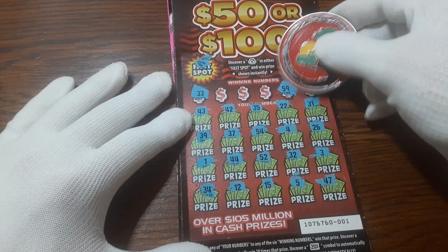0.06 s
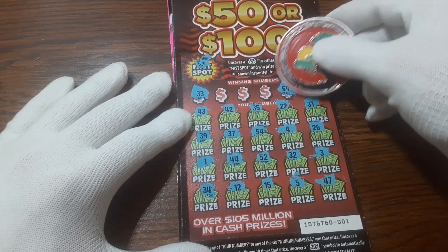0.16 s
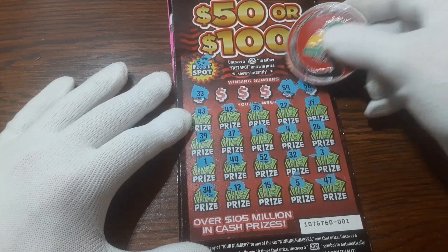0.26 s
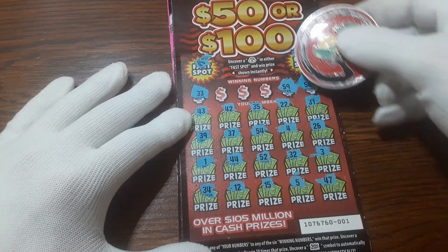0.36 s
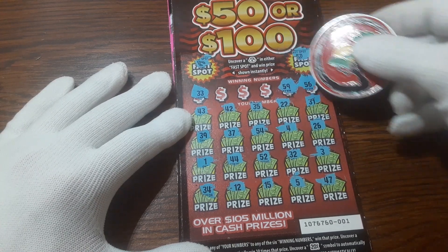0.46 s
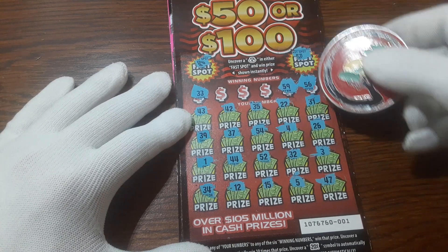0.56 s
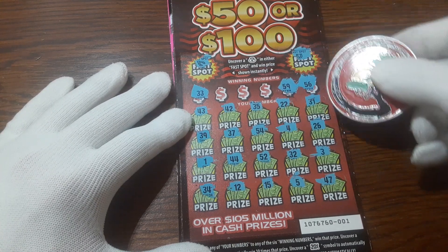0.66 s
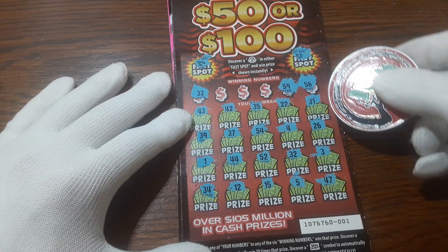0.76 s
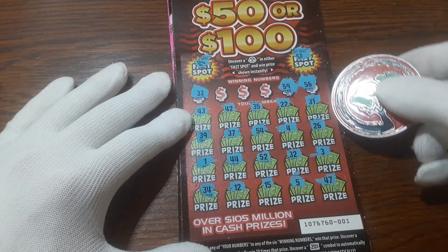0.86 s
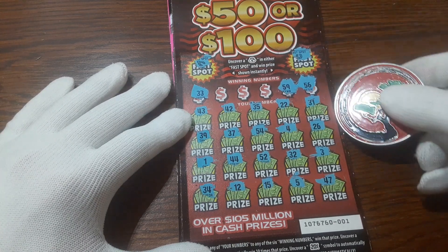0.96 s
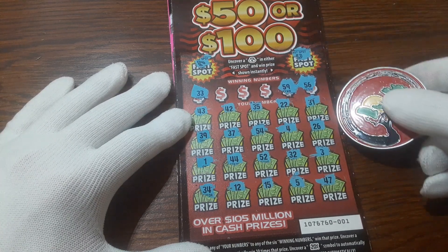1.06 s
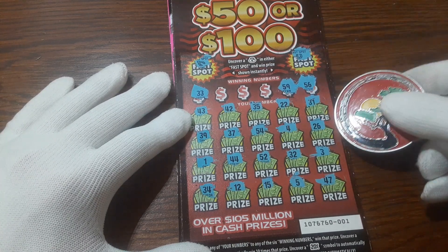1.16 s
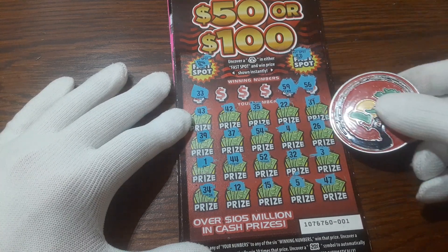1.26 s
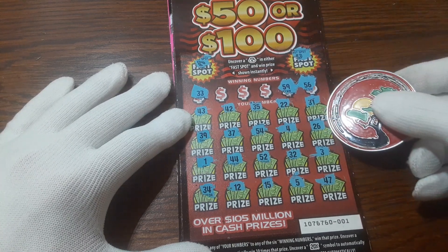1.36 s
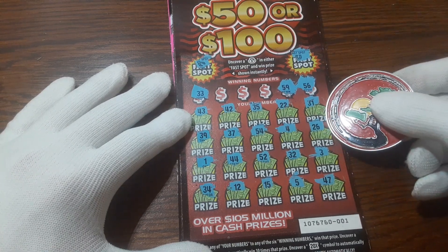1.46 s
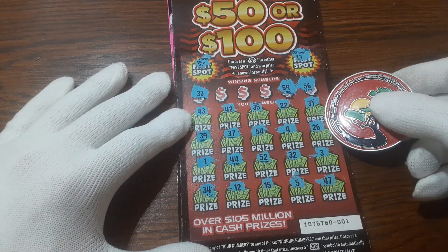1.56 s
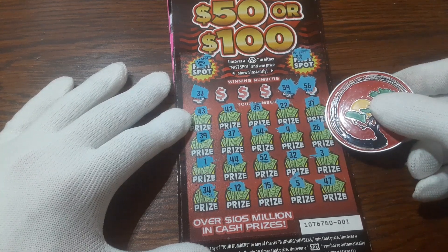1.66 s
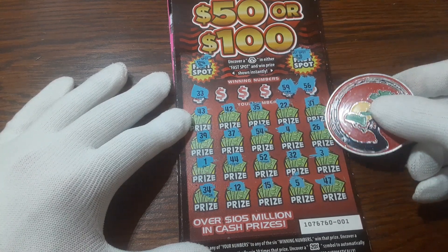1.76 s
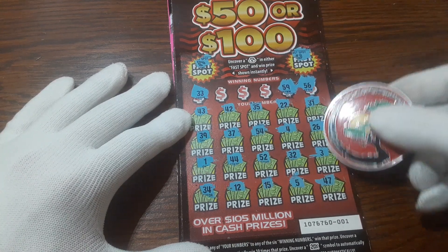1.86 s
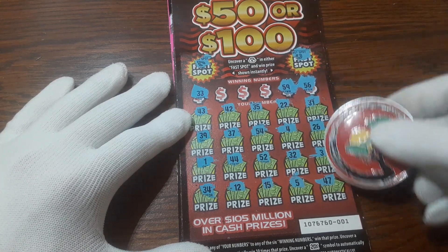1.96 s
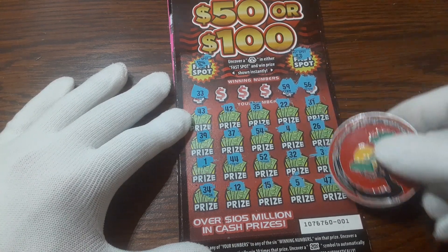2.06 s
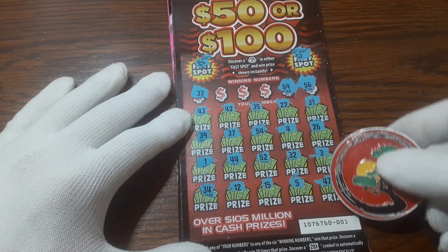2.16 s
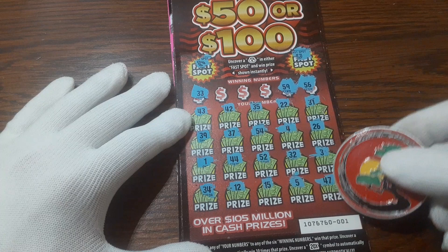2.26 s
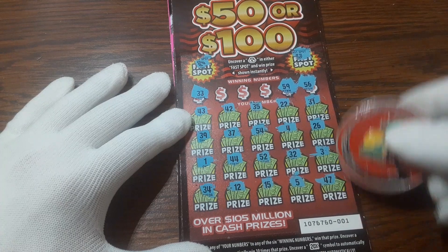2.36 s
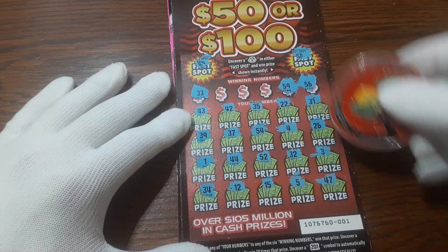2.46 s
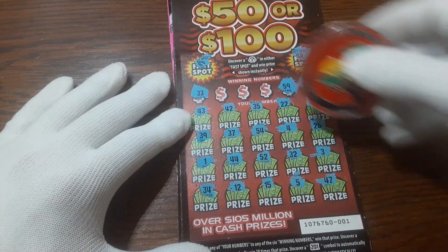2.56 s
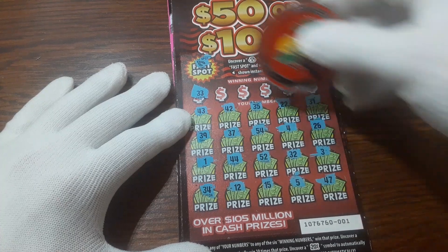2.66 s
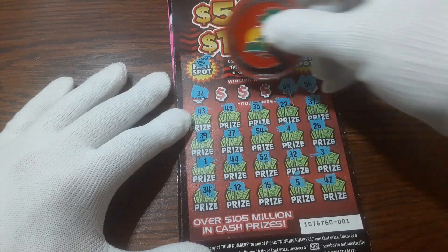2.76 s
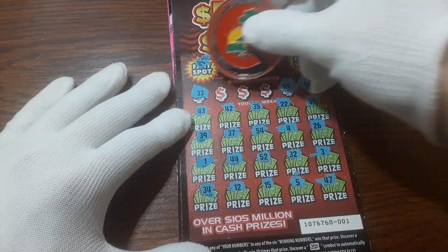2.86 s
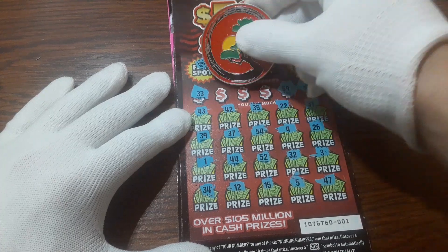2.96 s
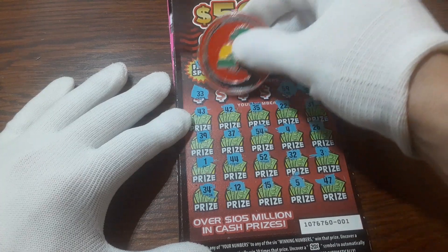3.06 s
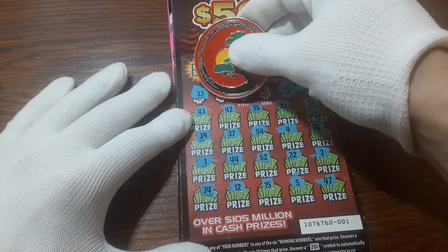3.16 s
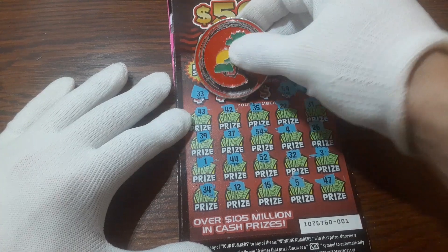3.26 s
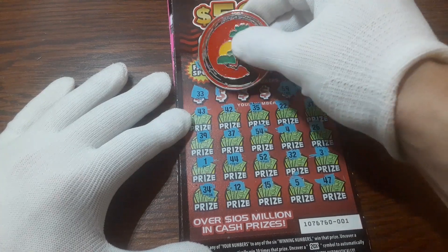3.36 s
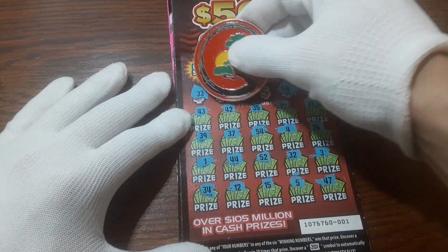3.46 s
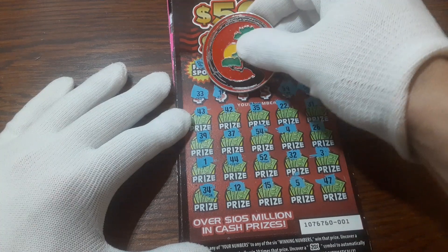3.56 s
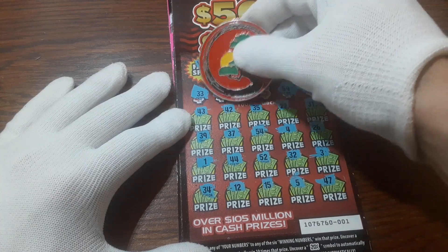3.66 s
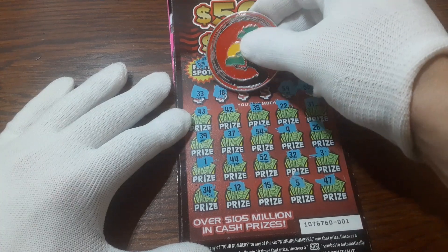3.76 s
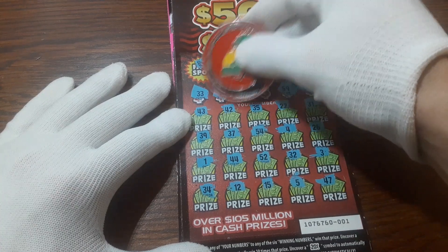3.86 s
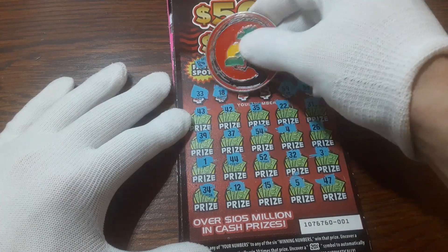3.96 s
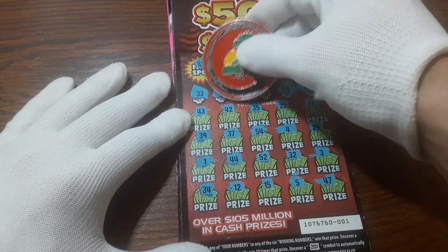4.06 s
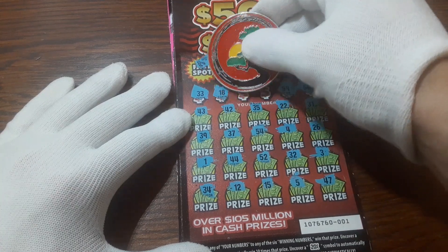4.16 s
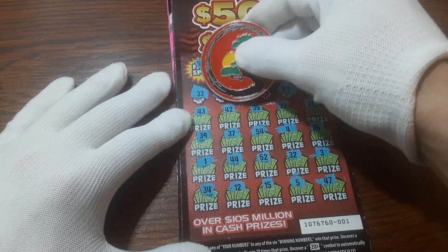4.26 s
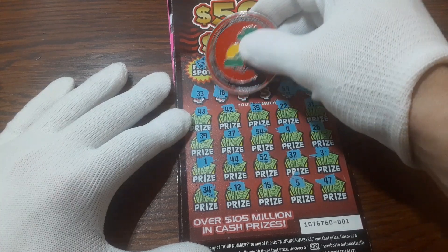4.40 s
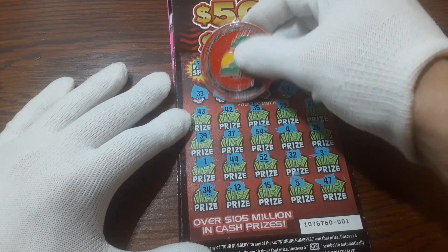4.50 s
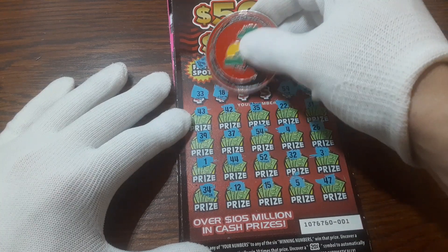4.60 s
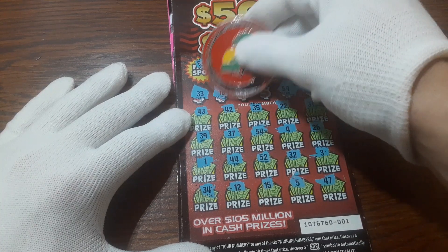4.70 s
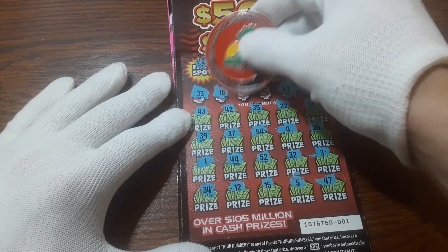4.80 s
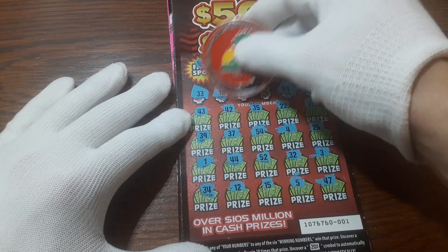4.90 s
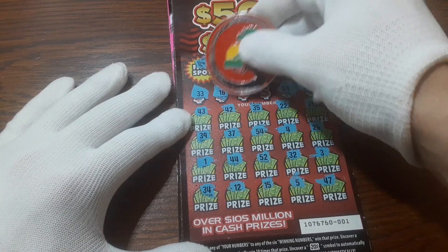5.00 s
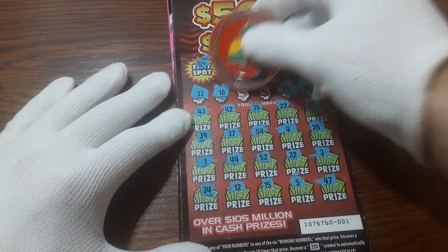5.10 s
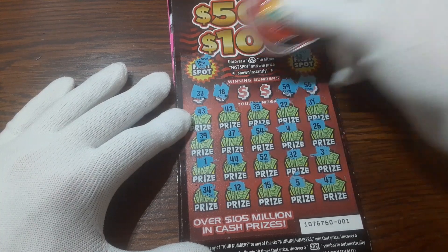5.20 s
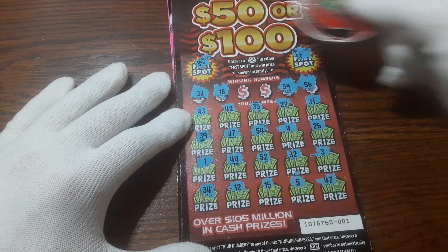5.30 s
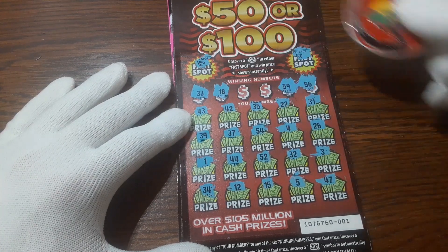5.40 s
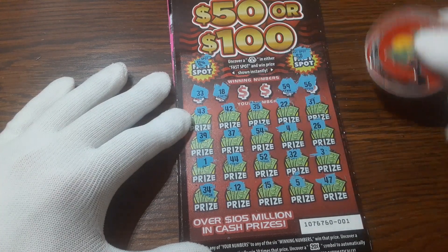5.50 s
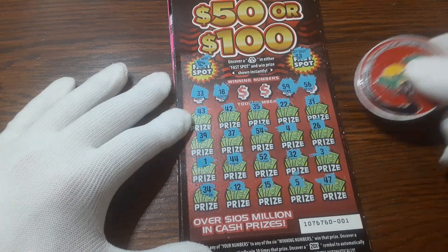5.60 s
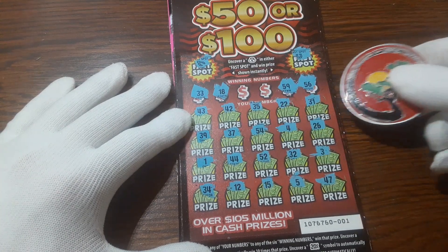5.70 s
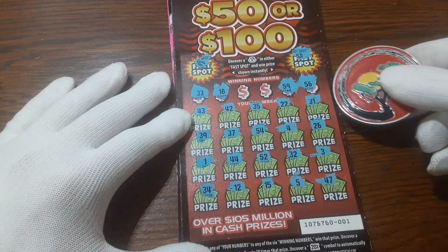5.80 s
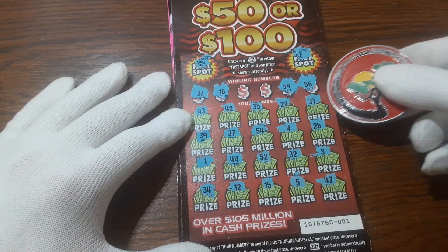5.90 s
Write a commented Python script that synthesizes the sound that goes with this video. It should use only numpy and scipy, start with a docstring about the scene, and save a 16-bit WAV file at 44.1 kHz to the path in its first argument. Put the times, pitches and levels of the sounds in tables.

```python
"""A gloved hand scrapes a metal coin back and forth over a coated card on a wooden table in a quiet room.
First come a few short strokes: grains hiss, the table rumbles and the rim ticks and knocks. Next the glove
rustles as bright noise, a run of short rings gurgles, and the coin glides lightly as noise in two resonances.
Then the main strokes follow close together, with hard knocks of the ringing table top, and the glove rustles
again. A wavering appliance hum around steady low tones, and noisy microphone hiss, last throughout."""
import sys
import numpy as np
from scipy import signal
from scipy.fft import rfft, irfft
from scipy.io import wavfile

SR = 44100
rng = np.random.default_rng(int(sys.argv[2]) if len(sys.argv) > 2 else 0)


def to_wav(s):
    """Save 16-bit WAV."""
    ch = np.atleast_2d(s).T  # columns
    pcm = np.round(np.clip(ch, -1, 1) * 32767)  # PCM
    wavfile.write(sys.argv[1], SR, pcm.astype(np.int16))


N = 261954
T = np.arange(N) / SR  # time of every sample [s]

# All levels in the tables are set before the gains of the mix.


def amp(db):
    """Decibels to gain."""
    return 10 ** (np.asarray(db) / 20)


def rms_one(x):
    """Scale to unit rms."""
    return x / np.sqrt(np.mean(x ** 2) + 1e-20)


def at_hz(points, hz):
    """Read a spectrum table on a log-frequency axis."""
    table_hz, values = np.array(points).T
    return np.interp(np.log(np.maximum(hz, 1)), np.log(table_hz), values)


def ring(x, hz, t60):
    """A damped resonance: a unit click sets a sine ringing that falls 60 dB in t60 seconds."""
    radius, turn = amp(-60 / (t60 * SR)), 2 * np.pi * hz / SR
    return signal.lfilter([0, np.sin(turn)], [1, -2 * radius * np.cos(turn), radius * radius], x + 1e-18)


def body(force, modes):
    """All ringing modes of one object, driven by one force, with alternating sign."""
    return sum((-1) ** k * amp(db) * ring(force, hz, t60) for k, (hz, db, t60) in enumerate(modes))


def grains(per_s, spread_db):
    """Random clicks of uneven size, rms 1."""
    sizes = amp(spread_db * np.minimum(rng.exponential(1, N), 4)) * rng.choice([-1, 1], N)
    return rms_one(sizes * (rng.random(N) < per_s / SR))


def drift(per_s):
    """A wandering line through random points, per_s of them each second (60 at most)."""
    points = rng.standard_normal(int(N / SR * 60) + 2)
    return np.interp(T * min(per_s, 60), np.arange(len(points)), points)


def spread(mid, side, spectrum, likeness, lead=((1, 0), (2, 0))):
    """Colour two unrelated signals and mix them to a stereo pair of given likeness and phase lead."""
    hz = np.fft.rfftfreq(N, 1 / SR)
    gain = rms_one(amp(at_hz(spectrum, hz)))
    alike = np.clip(at_hz(likeness, hz), -1, 1)
    mid = np.sqrt((1 + alike) / 2) * rfft(mid)
    side = np.sqrt((1 - alike) / 2) * rfft(side)
    left = (mid + side) * np.exp(1j * at_hz(lead, hz))
    return irfft(gain * np.array([left, mid - side]), N)


def swell(rows, level_db, rise_sharp, fall_sharp, longer_s=0, later_s=0):
    """Envelope of movements (peak s, length s, rise share, ..): each speeds up to its level and slows down."""
    power = np.zeros(N)
    for row, db in zip(rows, level_db):
        middle = row[0] + later_s
        near = slice(max(int((middle - .3) * SR), 0), int((middle + .3) * SR))
        lag = T[near] - middle
        rise = np.clip(row[2], .1, .9)
        reach = np.abs(lag) / ((row[1] + longer_s) * np.where(lag < 0, rise, 1 - rise))
        drop_db = 10 * reach ** np.where(lag < 0, rise_sharp, fall_sharp)
        power[near] += amp(2 * (db - drop_db))
    return np.sqrt(power)


def pushes(events, ring_s, soft_s):
    """Damped swings at each event's own pitch, rising over the contact time soft_s."""
    out, age = np.zeros(N), T[:8000]
    for s, db, hz in events:
        start = round(s * SR)
        shape = (1 - np.exp(-age / soft_s)) * amp(-60 * age / ring_s)
        out[start:start + 8000] += amp(db) * shape / shape.max() * np.sin(2 * np.pi * hz * age)
    return out


def placed(x, pan_db, left_lag):
    """One source at two ports: left is louder by pan_db and later by left_lag samples."""
    late = np.interp(np.arange(N) - left_lag, np.arange(N), x)
    return np.array([late, x]) * amp([[pan_db / 2], [-pan_db / 2]])


def reflections(x):
    """A short noise tail, different at each port, falling 60 dB in 0.1 s."""
    tails = rng.standard_normal((2, 6000)) * amp(-60 * T[:6000] / .1)
    return signal.fftconvolve(x, tails / np.linalg.norm(tails[0]), axes=1)[:, :N]


# colour of the microphone hiss: (frequency [Hz], level [dB per Hz])
FLOOR_COLOUR = [(82, -20), (140, -5), (170, 0), (250, -8), (310, -3.5), (390, -15), (600, -13), (1090, -18),
                (1720, -20.5), (5500, -26.5), (8000, -23.5), (9800, -28), (12500, -20), (15800, -17.5)]
# how alike left and right are in it: (frequency [Hz], likeness [-1 to 1])
FLOOR_ALIKE = [(60, 0.94), (180, -0.44), (550, -0.12), (1650, 0.017), (4970, -0.079), (15000, 0.012)]
FLOOR_DB = -72


def microphone_hiss():
    """Steady coloured noise, partly shared by the two ports."""
    noise = spread(*rng.standard_normal((2, N)), FLOOR_COLOUR, FLOOR_ALIKE)
    return amp(FLOOR_DB) * noise * amp([[3.5], [.5]])


# low resonances of the appliance hum: (frequency [Hz], width [Hz], level [dB])
HUM = [(51.55, 2.95, -66.5), (59.3, 11, -72.5), (75.3, 25, -68.5), (103, 15, -78), (119.5, 1.8, -84.5)]


def hum():
    """Motor hum and house rumble: wavering noise around steady tones, which are stronger in narrow resonances."""
    out = 0
    for hz, width, db in HUM:
        noise = rng.standard_normal(N + SR)  # one extra second lets the rings build up
        wavering = rms_one(ring(ring(noise, hz, 1.1 / width), hz, 0.82 / width)[SR:])
        tone = 6.24 / width * np.sin(2 * np.pi * hz * T)
        out = out + amp(db) * (wavering + tone)
    return placed(out, 5.6, 2.2)


# the cotton glove brushes as the hand moves:
# (loudest moment [s], length [s], share spent speeding up [0-1], level [dB])
RUSTLE = [(0.38, .13, 0.47, -71.5), (5.60, 0.16, 0.3, -73.5), (5.806, .09, 0.8, -80)]
# colour of the rustle: (frequency [Hz], level [dB per Hz])
RUSTLE_COLOUR = [(3000, -21), (6000, -2.5), (8000, 2), (10000, -1), (12500, 4), (15800, 2)]


def rustle():
    """Fine fibres brushing: soft, bright noise made of many grains."""
    level = swell(RUSTLE, np.array(RUSTLE)[:, 3], 3.3, 2.5)
    return level * spread(grains(8000, 2.7), grains(8000, 3.1), RUSTLE_COLOUR, HISS_ALIKE)


# the coin slides lightly over bare wood:
# (loudest moment [s], length [s], share spent speeding up [0-1], level [dB])
SLIDE = [(1.952, 0.073, 0.8, -85.5), (2.15, 0.2, 0.66, -91)]
# the two broad resonances it whispers through: (frequency [Hz], width [Hz], level [dB])
SLIDE_RINGS = [(2630, 260, 16.5), (7500, 2150, 7.5)]


def slide():
    """A light glide: grains whisper through two broad resonances."""
    noise = np.array([grains(5000, 4.4), grains(5000, 3.4)])
    noise = noise * swell(SLIDE, np.array(SLIDE)[:, 3], 0.94, 1.1)
    return sum(amp(db) * ring(noise, hz, 3.6 / width) * width / 1800 for hz, width, db in SLIDE_RINGS)


# runs of gurgle pulses: (start [s], number of pulses, level [dB], middle pitch [Hz])
GURGLE = [(0.873, 1, -65, 517), (0.937, 3, -50.5, 493), (0.973, 7, -51, 520), (1.081, 3, -50, 558),
          (1.123, 1, -56, 434), (1.143, 2, -60.5, 570), (1.18, 2, -53.5, 523), (1.211, 1, -64, 530),
          (1.252, 1, -53.5, 524), (1.278, 1, -58.5, 535), (1.298, 2, -55.5, 495), (1.327, 1, -63, 475),
          (1.36, 1, -59, 487)]
PULSE_GAP_S, GAP_JITTER_S = .0118, 0.0011  # spacing within a run, random shift
PULSE_SPREAD_HZ, PULSE_SPREAD_DB = 17, 0.7  # random spread of pitch and level


def gurgle():
    """Each pulse is a bubble-like ring of a few cycles with a soft start and a blurred tail."""
    out, age = np.zeros(N), T[:2000]
    shape = age / 0.0017 * np.exp(1 - age / 0.0021)
    for run_start, count, db, run_hz in GURGLE:
        for k in range(round(count)):
            late, high, loud = rng.standard_normal(3)
            start = round((run_start + k * PULSE_GAP_S + GAP_JITTER_S * late) * SR)
            hz = run_hz + PULSE_SPREAD_HZ * high
            gain = amp(db - 3 + PULSE_SPREAD_DB * loud)
            out[start:start + 2000] += gain * shape * np.sin(2 * np.pi * hz * age)
    return placed(out, 1.5, .1) + amp(-5) * reflections(out[None])


# pressure of the coin resting on the card between strokes, as its hiss: (time [s], level [dB])
PRESSURE = [(0.0, -69.5), (0.15, -72.5), (0.3, -94.5), (0.45, -92), (2.92, -94.5), (3.02, -74),
            (3.27, -102), (3.5, -68), (4.0, -79.5), (4.3, -72.5), (4.6, -70), (4.95, -76.5), (5.12, -89),
            (5.35, -88)]


def pressure():
    """Resting pressure as a gain in time; it feeds the hiss, the drag and the rumble."""
    return amp(np.interp(T, *np.transpose(PRESSURE)))


# the hand bears down and the whole table thumps: (time [s], level [dB], pitch [Hz])
THUMPS = [(0.004, -37, 115), (0.267, -42, 120), (2.986, -39.5, 166), (3.004, -43, 129), (3.121, -36.5, 120),
          (3.483, -30.5, 120.5), (3.805, -36.5, 99), (4.011, -42, 138), (4.208, -38, 155),
          (4.397, -36, 113), (4.517, -36.5, 112), (4.589, -30.5, 118.3), (4.775, -35.5, 137)]
# lowest modes of the table: (frequency [Hz], level [dB], time to fall 60 dB [s])
DEEP_MODES = [(87.3, -8, 0.17), (110.8, -1, 0.3), (133.5, 0, 0.083)]
WEIGHT_LAG_S, WEIGHT_S = 0.027, 0.022  # the hand's weight lands after the stroke and lasts longer
REST_RUMBLE_DB = 28.5  # above the resting hiss


def rumble():
    """The hand's weight rocks the lowest modes of the table, and thumps add slow damped swings."""
    weight_db = np.array(STROKES)[:, 5]
    weight = swell(STROKES, weight_db, 0.82, 1.1, WEIGHT_S, WEIGHT_LAG_S)
    weight = np.hypot(weight, amp(REST_RUMBLE_DB) * pressure())
    rocking = weight * rms_one(body(rng.standard_normal(N), DEEP_MODES))
    out = amp(-10.5) * rocking + amp(-1.5) * pushes(THUMPS, 0.097, 0.0019)
    return placed(out, 5.2, 9.5)


# the rim catches and knocks the table: (time [s], level [dB], pitch of the contact [Hz])
KNOCKS = [(0.056, -32, 316), (3.081, -36, 340), (3.155, -34, 354), (3.800, -20, 345), (3.812, -25, 210),
          (4.01, -17.5, 352), (4.015, -52, 343), (4.212, -24.5, 305), (4.397, -24.5, 264),
          (4.582, -18.5, 341), (4.774, -22, 342), (4.973, -28, 344), (5.053, -30.5, 406)]


def knocks():
    """Short pushes swing at the pitch of the contact and leave the table top ringing."""
    blows = np.zeros(N)
    blows[[round(s * SR) for s, db, hz in KNOCKS]] = amp(np.array(KNOCKS)[:, 1] - 18.5)
    ringing = body(signal.lfilter([.2], [1, -.8], blows), TABLE_MODES)
    # a brighter, quicker snap about an octave above the swing
    snap = amp(-18) * pushes([(s, db, 2.004 * hz) for s, db, hz in KNOCKS], 0.026, 0.00027)
    swing = amp(-6.5) * pushes(KNOCKS, 0.044, .001)
    return snap + swing + ringing


# modes of the table top: (frequency [Hz], level [dB], time to fall 60 dB [s])
TABLE_MODES = [(170, -10, 0.042), (251, -10.5, 0.059), (302.3, -5, 0.038), (361.4, -6.5, 0.052),
               (454, -13.5, 0.053), (537.5, -14, 0.061), (627, -13, 0.04), (720.4, -23.5, 0.14),
               (810.4, -20.5, 0.07), (935, -28, 0.057), (1237, -20, 0.021)]
CREEP_DRAG_DB, REST_DRAG_DB = -6.5, 15.5  # creep against the stroke; resting drag above resting hiss


def table():
    """Friction shakes the table top under each stroke, and the knocks are added to it."""
    rough = np.array([grains(1500, 3.44), grains(1900, 2.0)])
    drag_db = np.array(STROKES)[:, 4]
    creep = swell(STROKES, drag_db + CREEP_DRAG_DB, 3.0, 0.8, CREEP_S)
    creep = np.hypot(creep, amp(REST_DRAG_DB) * pressure())
    # slow creep is duller
    resting = signal.sosfilt(signal.butter(2, 420, fs=SR, output="sos"), rough * creep)
    force = rough * swell(STROKES, drag_db, 1.6, 1.03) + resting
    middle, side = body(force, TABLE_MODES) / np.std(body(rough[0], TABLE_MODES))
    # the upper modes reach the two ports from different parts of the top
    side = amp(-8.0) * signal.sosfilt(signal.butter(3, 480, "high", fs=SR, output="sos"), side)
    return placed(middle + knocks(), 3.6, 9.0) + side * [[1], [-1]]


# single ticks of the rim on the card: (time [s], level [dB])
TICKS = [(0.0603, -39), (0.1235, -48.5), (0.2615, -48.5), (0.585, -72), (0.952, -56.5), (2.9821, -56),
         (4.011, -38), (4.0844, -70), (4.2606, -56), (4.3114, -59), (4.384, -60), (4.398, -50.5),
         (4.465, -62), (4.5068, -73), (4.513, -52), (4.664, -58), (4.7745, -56), (4.7889, -44),
         (4.847, -53), (4.8623, -55), (4.973, -56), (4.9857, -47.5), (5.036, -58), (5.055, -49),
         (5.146, -58)]
# colour of a tick: (frequency [Hz], level [dB per Hz])
TICK_COLOUR = [(650, -44), (1100, -13.5), (1660, -5), (2590, -6.5), (3200, -2.5), (5110, -4), (6100, -9.5),
               (7880, 2), (10600, -25), (11600, -10), (15700, -36)]
# modes of the coin: (frequency [Hz], level [dB], time to fall 60 dB [s])
COIN_MODES = [(2740, -10.5, 0.15), (4176, -6, 0.055), (7180, 7, 0.0087), (9540, 10, 0.024)]
RATTLE_T60_S = .014  # time for one tick to fall 60 dB


def ticks():
    """Each catch of the rim is a rattle of a few milliseconds; the gripped coin rings briefly."""
    out = np.zeros(N)
    for s, db in TICKS:
        start = round(s * SR)
        rattle = rng.standard_normal(300)
        out[start:start + 300] += amp(db - 60 * T[:300] / RATTLE_T60_S) * rattle
    out = amp(2.0) * out + amp(-31) * body(out, COIN_MODES)
    return spread(out, 0.14 * out, TICK_COLOUR, HISS_ALIKE, HISS_LEAD)


# strokes of the coin: (fastest moment [s], length [s], share spent speeding up [0-1],
# hiss level [dB], drag on the table [dB], weight of the hand [dB])
STROKES = [(0.0, 0.0049, 0.43, -49, -40.5, -29), (0.064, 0.015, 0.62, -47, -46.5, -45),
           (0.121, 0.0077, 0.37, -50, -48, -58), (0.147, 0.063, 0.34, -70.5, -56.5, -45.5),
           (0.252, 0.054, 0.36, -67.5, -58, -50), (0.289, 0.044, 0.24, -65.5, -77, -63),
           (2.351, 0.039, 0.4, -69, -90, -82), (2.981, 0.025, 0, -66, -55, -34.5),
           (3.134, 0.066, 0.61, -53.5, -44, -53), (3.19, 0.068, 0.69, -65, -48, -46.5),
           (3.363, 0.057, 0.46, -50, -47.5, -35.5), (3.476, 0.034, 0.39, -40, -43.5, -34),
           (3.583, 0.048, 0.59, -43, -43.5, -51), (3.702, 0.035, 0.44, -46.5, -47, -43),
           (3.798, 0.056, 0.53, -45, -40.5, -32.5), (3.909, 0.044, 0.41, -44.5, -40.5, -34),
           (4.016, 0.03, 0.65, -51.5, -37, -36.5), (4.111, 0.045, 0.66, -52.5, -46, -38),
           (4.206, 0.03, 0.58, -46.5, -43, -51), (4.295, 0.07, 0.64, -59.5, -44.5, -55),
           (4.402, 0.038, 0.56, -67, -41.5, -39), (4.516, 0.022, 1, -61, -42, -42),
           (4.589, 0.022, 0.4, -44.5, -38.5, -43), (4.665, 0.056, .48, -67, -45, -49),
           (4.791, 0.02, 0.3, -60.5, -47, -43), (4.857, 0.073, 0.28, -63.5, -46.5, -51),
           (4.99, 0.0048, 0.63, -48, -37.5, -36.5), (5.035, 0.015, 0.43, -60, -49.5, -39),
           (5.053, 0.023, 0.14, -56, -47.5, -40.5), (5.149, 0.028, 0.9, -68.5, -54.5, -61)]
# colour of the hiss: (frequency [Hz], level [dB per Hz])
HISS_COLOUR = [(590, -73), (1000, -10), (1600, -8.5), (1760, -16.5), (1930, -8.5), (2110, -6), (2350, 4),
               (2990, -0.5), (4130, 2), (5320, -5), (7260, -5), (7960, 2), (9350, -15.5), (15000, -17),
               (15700, -67)]
# how alike left and right are in it: (frequency [Hz], likeness [-1 to 1])
HISS_ALIKE = [(1000, 0.18), (2500, 0.4), (6000, 0.1), (12000, 0.051)]
# how far left leads right in it: (frequency [Hz], phase lead [radians])
HISS_LEAD = [(0, 0), (1290, 2), (1890, 13.5), (5170, 14), (7240, 22.5), (10600, 36.5), (11200, 25),
             (12400, 28), (13400, 24), (15400, 56)]
# edges of the bands whose levels wander separately: (frequency [Hz])
BAND_EDGES_HZ = [700, 1300, 2000, 3000, 4500, 6500, 8800, 12000, 16500]
CREEP_S, CREEP_HISS_DB = 0.046, -18  # the rim creeps before and after each stroke: added length, level
TOP_DB, TOP_BITE, CARD_BITE = -0.1, 0.04, 0.16  # bite: growth where hiss stands above drag [dB per dB]
FRESH_FROM_S, FRESH_TO_S = 3.05, 3.96  # strokes over untouched coating
FRESH_TOP_DB, FRESH_CARD_DB = 0.5, 4.5  # thick coating tears brighter and rasps the card harder
HISS_RISE_SHAPE = 2.7  # exponent of the speed-up


def scrape():
    """The rim tears the coating in clumps of grains; its grip changes the colour from moment to moment."""
    s, length, rise, hiss_db, drag_db, weight_db = np.transpose(STROKES)
    bite_db = hiss_db - drag_db
    fresh = (s > FRESH_FROM_S) & (s < FRESH_TO_S)
    creep = np.hypot(swell(STROKES, hiss_db + CREEP_HISS_DB, 1.0, 1.1, CREEP_S), pressure())
    level = np.hypot(swell(STROKES, hiss_db, HISS_RISE_SHAPE, 2.84), creep)
    top_db = hiss_db + TOP_DB + FRESH_TOP_DB * fresh + TOP_BITE * bite_db
    top_level = np.hypot(swell(STROKES, top_db, HISS_RISE_SHAPE, 2.6), creep * amp(2.8))
    # long strokes set the card itself rasping below 2 kHz, short ones hardly
    card_db = hiss_db + FRESH_CARD_DB * fresh + CARD_BITE * bite_db + 10.8 * np.log2(length / 0.04)
    card_level = np.hypot(swell(STROKES, card_db, 3.0, 1.36), creep * amp(8.5))
    grit = np.array([grains(5000, 3.3), grains(5000, 3.3)])
    grit = grit * amp(2.0 * drift(55) + 3)
    pair = 0
    for low, high in zip(BAND_EDGES_HZ, BAND_EDGES_HZ[1:]):
        band_level = top_level if low > 8000 else card_level if low < 1500 else level
        band_filter = signal.butter(2, [low, high], "band", fs=SR, output="sos")
        band = signal.sosfilt(band_filter, grit * band_level)
        pair = pair + amp(1.3 * drift(40)) * band
    return spread(*pair, HISS_COLOUR, HISS_ALIKE, HISS_LEAD)


def scene():
    """Sum the sources at the two microphone ports."""
    background = microphone_hiss() + hum()
    bright = (rustle() + slide() + ticks() + scrape()) * amp([[3.5], [-.5]])
    bright = bright + amp(-6.5) * reflections(bright)
    return background + gurgle() + rumble() + table() + bright


def record(dry):
    """The microphone drops the deepest bass; the top is cut steeply."""
    dry = signal.sosfilt(signal.butter(8, 44, "high", fs=SR, output="sos"), dry)
    return signal.sosfilt(signal.ellip(12, .5, 70, 15830, fs=SR, output="sos"), dry)  # cutoff 15830 Hz


dry = scene()
out = record(dry)
to_wav(out)
```